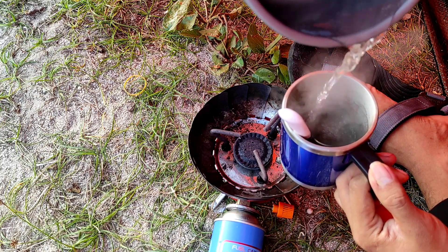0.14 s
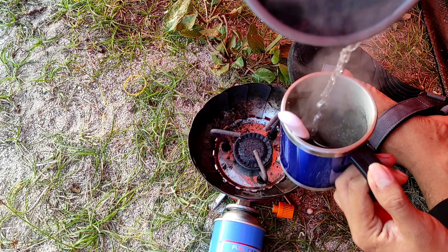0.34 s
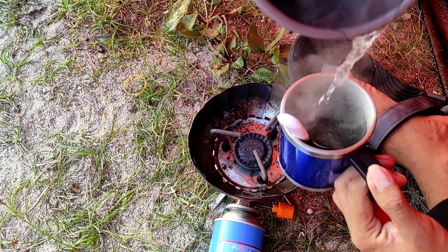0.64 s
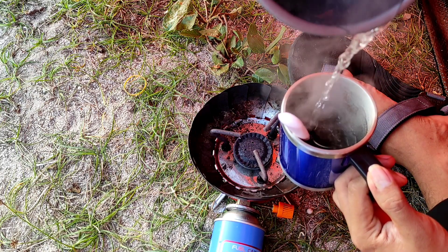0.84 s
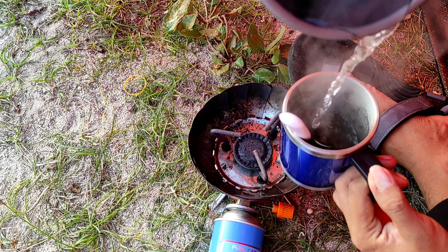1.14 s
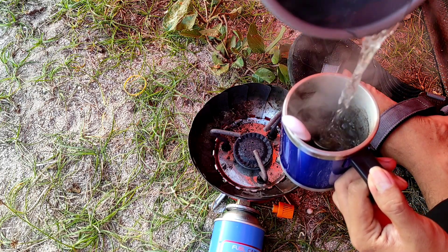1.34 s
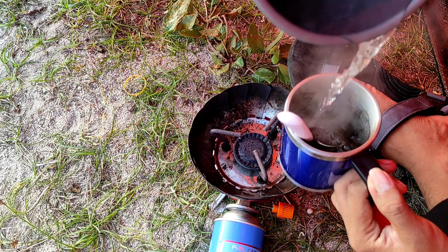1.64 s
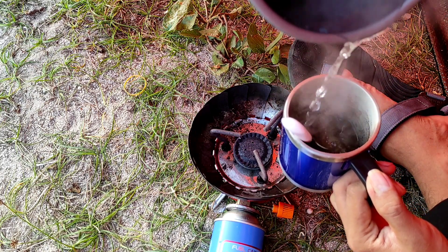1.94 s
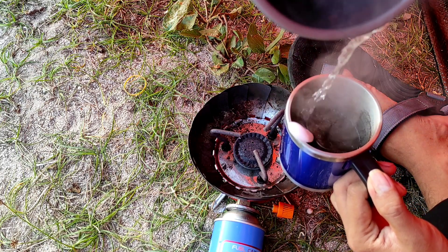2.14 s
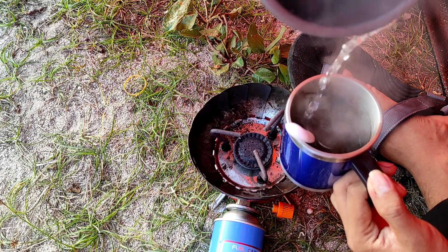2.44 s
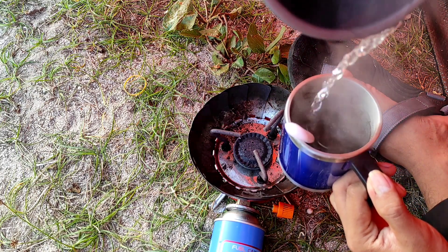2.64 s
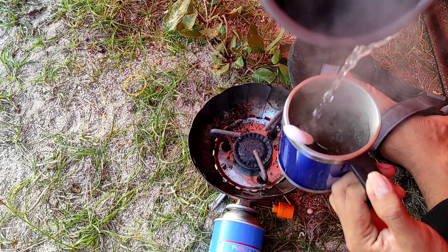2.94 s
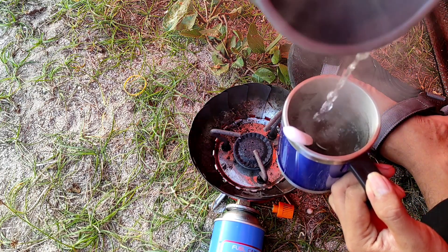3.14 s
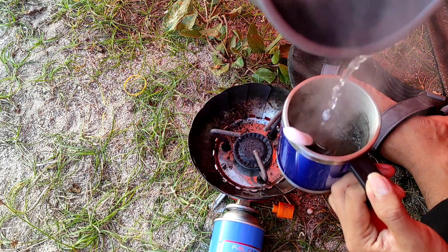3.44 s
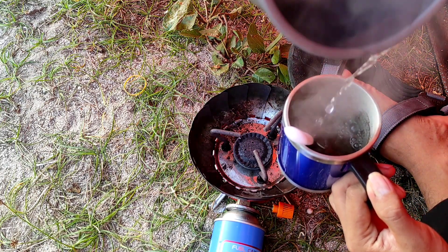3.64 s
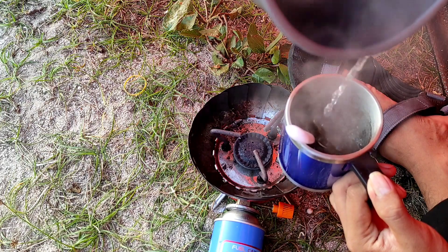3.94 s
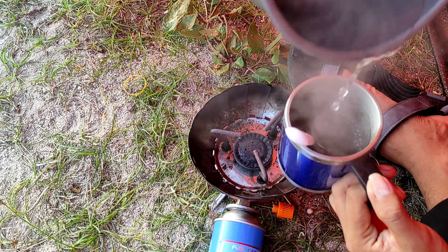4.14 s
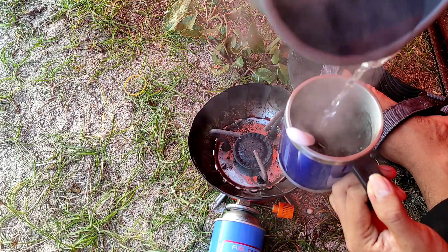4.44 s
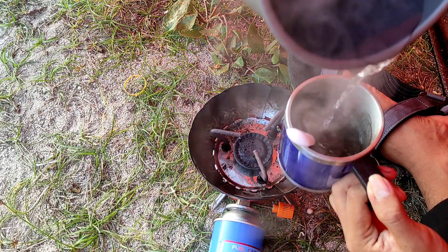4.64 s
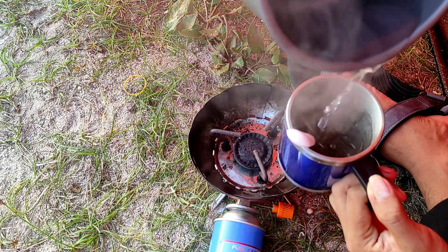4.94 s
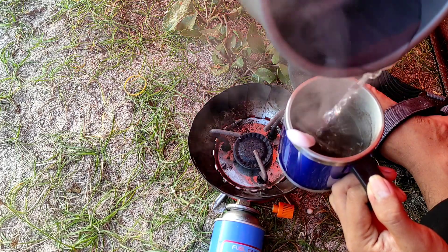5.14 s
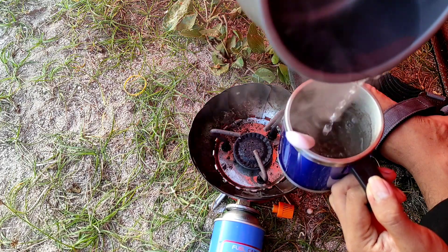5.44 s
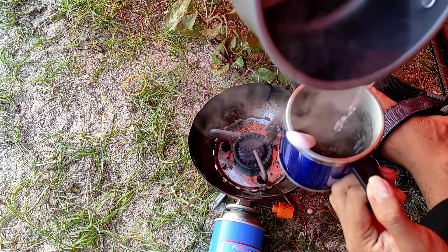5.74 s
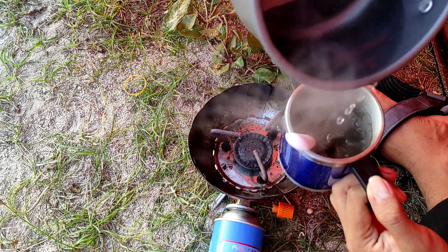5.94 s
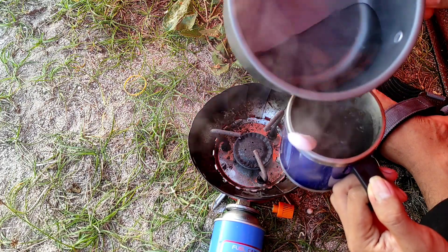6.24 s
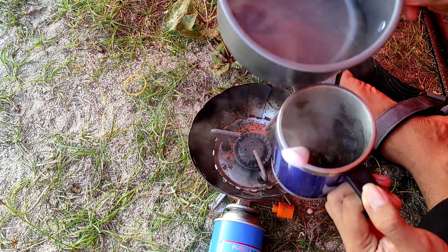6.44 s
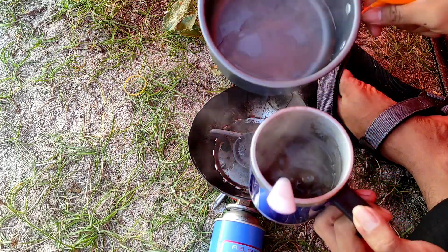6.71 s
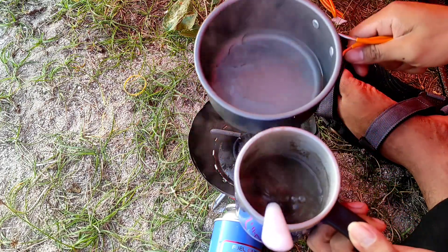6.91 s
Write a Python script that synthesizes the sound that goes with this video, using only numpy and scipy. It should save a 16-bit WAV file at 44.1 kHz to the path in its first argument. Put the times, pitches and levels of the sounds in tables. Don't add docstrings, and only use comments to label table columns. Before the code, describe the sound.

Hot water trickles unevenly into a metal mug with plops and fizzy spatter, then a pot knocks sharply against a stove and the mug scrapes briefly.

```python
import sys
import numpy as np
from scipy import signal
from scipy.fft import rfft, irfft, next_fast_len
from scipy.io import wavfile
from scipy.ndimage import uniform_filter1d

SR = 44100
rng = np.random.default_rng(int(sys.argv[2]) if len(sys.argv) > 2 else 0)


def put_to_file(sound):
    columns = np.atleast_2d(sound).T
    safe = np.clip(columns, -1, 1)
    whole_steps = np.round(safe * 32767)
    wavfile.write(sys.argv[1], SR, whole_steps.astype(np.int16))


def volts_from_db(level):
    exponent = np.asarray(level, float) / 20
    return 10 ** exponent


N = 311787

# (time [s], bubble level [dB], bubble pitch [Hz], gulp level [dB])
PLOPS = [(0.872, -40, 920, -58), (0.922, -42.5, 954, -59), (1.304, -36.5, 990, -46.5),
         (2.113, -38, 1000, -51), (2.206, -36.5, 885, -41), (2.23, -32.5, 1020, -48),
         (2.254, -37, 1000, -47), (2.268, -37, 1040, -49), (2.419, -31.5, 1023, -40), (2.48, -37, 970, -56),
         (2.537, -37.5, 945, -44.5), (2.58, -35, 1060, -44.5), (2.931, -37.5, 960, -46.5),
         (2.943, -36.5, 1050, -44.5), (3.165, -37.5, 1090, -47), (3.229, -36.5, 1130, -44.5),
         (3.249, -36, 1080, -55), (3.276, -30, 1105, -45.5), (3.41, -35, 1104, -50),
         (3.582, -34, 966, -44.5), (3.677, -35, 1070, -39), (4.203, -38.5, 1190, -55),
         (4.461, -38.5, 1050, -49), (4.659, -37.5, 1050, -51.5), (4.7, -39.5, 1110, -50),
         (4.734, -39, 1100, -49), (5.238, -39, 1175, -46.5), (5.39, -33.5, 1140, -39.5),
         (5.558, -38.5, 1090, -47), (5.607, -29, 1197, -54)]
# (time [s], bubble level [dB], bubble pitch [Hz])
PLIPS = [(0.463, -47.5, 1350), (0.609, -48, 1580), (0.776, -45, 1320), (0.813, -43, 960), (1.12, -48, 1570),
         (1.582, -42.5, 950), (2.135, -42.5, 1000), (2.803, -40.5, 1120), (2.821, -41.5, 990),
         (2.962, -41.5, 1050), (3.042, -41, 1010), (3.059, -41, 1030), (3.174, -39.5, 990),
         (3.309, -38.5, 985), (3.372, -40, 1114), (3.484, -39, 1096), (3.744, -38.5, 1060),
         (3.876, -44.5, 1100), (3.92, -46, 1380), (4.118, -41, 1100), (4.606, -43, 1110), (4.78, -43, 1130),
         (4.865, -44.5, 1230), (5.018, -43, 1120), (5.136, -46, 970), (5.183, -44, 1140),
         (5.285, -45.5, 1170), (5.415, -41.5, 1230), (5.703, -45, 1050), (5.969, -50.5, 905)]
BEADS = [(0.014, -49, 920), (0.025, -54, 1030), (0.06, -48.5, 960), (0.36, -48, 1040), (0.508, -47.5, 1340),
         (0.541, -49.5, 990), (0.822, -43.5, 950), (0.885, -46, 970), (1.061, -47, 950), (1.129, -44, 1500),
         (1.241, -52, 940), (1.286, -47, 950), (1.595, -53, 920), (1.846, -48.5, 1060), (2.142, -48, 1070),
         (2.161, -46, 950), (2.466, -55, 950), (2.496, -44, 970), (2.605, -46, 1140), (2.613, -45.5, 970),
         (2.64, -44, 1100), (2.653, -44, 1050), (2.682, -46, 1110), (2.753, -42.5, 1070),
         (2.811, -45.5, 1090), (2.995, -45.5, 960), (3.102, -46, 1050), (3.141, -46, 1060),
         (3.209, -40, 1060), (3.325, -42, 1040), (3.554, -42, 1035), (3.569, -48, 1090), (3.692, -48, 1120),
         (3.715, -41, 1170), (3.77, -45, 1060), (4.083, -49, 1190), (4.108, -44.5, 1110),
         (4.146, -45.5, 950), (4.216, -44, 1040), (4.238, -46, 1110), (4.357, -47, 1010),
         (4.516, -47.5, 990), (4.75, -44, 1660), (4.909, -49, 1130), (4.994, -45.5, 1110),
         (5.089, -46.5, 970), (5.173, -46.5, 1070), (5.322, -45, 1250), (5.335, -42.5, 1200),
         (5.442, -44, 1120), (5.454, -44, 1200), (5.482, -43, 1700), (5.598, -41, 980), (5.626, -48, 1140),
         (5.659, -44, 990), (5.713, -51, 1200), (5.755, -53.5, 1110), (5.78, -47, 1100)]
SPECKS = [(0.244, -53, 935), (0.276, -51, 940), (0.335, -51.5, 945), (0.644, -58, 940), (0.95, -48, 1020),
          (1.035, -50.5, 960), (1.35, -50.5, 1060), (3.191, -50, 1060), (3.269, -45, 1160),
          (3.296, -49, 1090), (3.34, -48, 980), (6.65, -62.5, 1350), (6.651, -62, 2600)]
# (time [s], gulp level [dB])
GULPS = [(4.84, -45.5), (4.867, -48.5), (4.903, -49), (5.09, -45.5), (5.172, -50), (5.518, -49)]
GULP_HZ, GULP_WIDTH_HZ = 525, 157
GULP_BELOW_DB, GULP_SPREAD_DB = -9, -4
TURNS_PER_DB = 0.2648
TORN_DB = -10

# (time [s], wall ring [dB], spray [dB])
SPLASHES = [(0.005, -38.5, -56), (0.764, -27, -46), (0.871, -34.5, -49), (0.918, -39.5, -50),
            (1.104, -42.5, -47), (1.285, -33, -46), (1.758, -37.5, -49), (1.842, -41, -54),
            (2.11, -37, -61), (2.243, -41.5, -42), (2.282, -41, -43), (2.419, -44, -48),
            (2.466, -41.5, -45.5), (2.48, -37, -63), (2.639, -38.5, -52), (2.802, -34.5, -53),
            (2.833, -41, -44.5), (2.887, -33, -64), (2.899, -33.5, -38.5), (3.064, -37, -60),
            (3.104, -39, -48), (3.202, -33, -48), (3.229, -29.5, -59), (3.25, -33, -54), (3.714, -39, -50),
            (3.744, -38, -48), (4.61, -38, -59), (4.751, -36, -37), (5.137, -31.5, -45.5),
            (5.414, -37.5, -44)]
SPRAYS = [(0.06, -44.5, -44.5), (0.506, -47, -46), (0.822, -45.5, -45), (0.899, -46, -43),
          (0.935, -54, -36), (1.033, -44.5, -46.5), (1.087, -47, -46), (1.887, -56, -47),
          (2.503, -38.5, -47), (2.819, -34.5, -44), (2.929, -49, -38), (3.017, -75, -39),
          (3.153, -39.5, -47), (3.325, -46, -43.5), (3.371, -41.5, -38.5), (3.437, -54, -41.5),
          (3.554, -45, -48.5), (3.768, -43.5, -47), (4.004, -67, -37.5), (4.084, -43, -50.5),
          (4.514, -42, -37.5), (4.658, -70, -47.5), (4.731, -62, -38.5), (4.84, -48, -45.5),
          (5.016, -51.5, -42.5), (5.234, -43, -44), (5.283, -37, -31.5), (5.32, -44.5, -44.5),
          (5.556, -51, -46), (5.608, -53, -46.5)]
DABS = [(0.012, -40.5, -38.5), (0.178, -50, -58), (0.215, -45, -53.5), (0.334, -44.5, -48.5),
        (0.361, -42, -49.5), (0.55, -46.5, -50.5), (0.683, -45.5, -47.5), (1.023, -50, -43.5),
        (1.314, -42, -57), (1.351, -42.5, -68), (1.717, -43, -47.5), (2.135, -39.5, -51.5),
        (2.448, -44, -48), (2.605, -38.5, -56), (3.692, -41, -45), (3.22, -29, -61), (3.528, -44.5, -49),
        (3.615, -48, -48), (3.677, -56, -79), (4.051, -44, -50), (4.245, -45, -49.5), (4.478, -52, -52),
        (4.809, -42, -49), (4.91, -41, -60), (4.925, -52, -45.5), (5.089, -46.5, -51.5), (5.266, -70, -46),
        (5.515, -45, -49.5), (5.706, -41, -44), (5.733, -48, -49.5)]
# (time [s], wall ring [dB], spray [dB])
EARLY_SPITS = [(0.025, -46.5, -59), (0.044, -54, -50), (0.081, -52, -56), (0.128, -74, -56),
               (0.46, -53, -64), (0.513, -56, -64), (0.608, -50, -59), (0.63, -47, -74),
               (0.701, -49.5, -66), (0.781, -52, -57), (0.802, -50, -52), (0.811, -48, -55),
               (0.836, -52, -48), (0.885, -49, -45), (0.951, -51.5, -50), (0.969, -56, -56),
               (1.012, -55, -46), (1.06, -50, -51), (1.122, -43, -55), (1.135, -50, -64), (1.185, -53, -53),
               (1.206, -57, -52), (1.221, -54, -58), (1.241, -49, -62), (1.253, -52, -55),
               (1.327, -52, -51), (1.373, -49, -57), (1.384, -54, -58), (1.594, -55, -52),
               (1.648, -58, -49.5), (1.671, -48, -52), (1.696, -52, -53), (1.772, -53, -50),
               (1.812, -58, -52), (1.868, -51, -60), (2.081, -53, -59), (2.089, -43, -61),
               (2.143, -53, -70), (2.193, -50, -65), (2.356, -57, -53), (2.515, -54, -65), (2.63, -42, -53),
               (2.653, -59, -64), (2.683, -52.5, -68), (2.724, -53, -57)]
LATE_SPITS = [(2.742, -53, -63), (2.75, -53, -62), (2.863, -47, -55), (2.956, -64, -41), (2.974, -53, -49),
              (2.992, -49, -48), (3.036, -46, -42.5), (3.141, -50, -43.5), (3.177, -52, -55),
              (3.294, -63, -50), (3.307, -52, -47.5), (3.352, -56, -49), (3.381, -63, -58),
              (3.449, -68, -54), (3.482, -47, -65), (3.568, -55, -56), (3.6, -53, -58), (3.858, -62, -52),
              (3.919, -57, -54.5), (3.988, -50, -58), (4.065, -49, -62), (4.107, -50, -62),
              (4.117, -57, -57), (4.159, -56, -62), (4.174, -50, -49.5), (4.237, -47, -59),
              (4.328, -53, -57), (4.343, -57, -50.5), (4.378, -52, -60), (4.575, -51, -52),
              (4.591, -64, -49.5), (4.641, -64, -54), (4.778, -53, -52), (4.865, -50, -63),
              (4.902, -46, -62), (4.945, -52, -60), (4.992, -58.5, -58), (5.028, -63, -54),
              (5.075, -59, -62), (5.301, -48, -60), (5.334, -66, -54), (5.352, -61, -57), (5.363, -51, -56),
              (5.442, -58, -53), (5.476, -74, -50.5), (5.779, -53, -65), (5.827, -61, -52)]
SPIT_RING_DB = 3
SLAP_DB, SLAP_SPRAY_DB = -2, -18

# (time [s], patter level [dB], fizz level [dB])
FLOW = [(0, -68, -74.5), (1.25, -64, -68), (1.85, -64, -69), (2.03, -69.5, -74), (2.2, -60.5, -71.5),
        (3.2, -65.5, -67), (3.75, -68, -87), (3.85, -73, -80), (4.2, -65, -66.5), (4.29, -71, -81),
        (4.45, -66, -69), (5.6, -66.5, -82), (5.85, -71.5, -82)]
# (time [s], length [s], level [dB], centre [Hz], width [Hz])
SHEETS = [
    (0.0, 0.043, -63.5, 4030, 4880),
    (0.392, 0.12, -57.5, 2050, 2080),
    (1.09, 0.093, -57.5, 1820, 2280),
    (2.713, 0.24, -57.5, 4100, 9000),
]
# (time [s], level [dB], centre [Hz], length [s])
DRIPS = [
    (6.073, -65, 1440, 0.0053),
    (6.117, -60, 2000, 0.0058),
]

# (time [s], column pitch [Hz], main wall tone [Hz])
COLUMN = [(0, 950, 2975), (2, 1020, 2995), (4, 1110, 3040), (6.2, 1190, 3100)]
# (pitch [Hz], width [Hz], level [dB])
WALL = [(1656, 167, -9.5), (3080, 530, -16), (4080, 310, -3.5), (2700, 224, 0), (1760, 69, -19.5),
        (3410, 180, -6)]
MUTE_DB_PER_S = -2.3
# (pitch [Hz], width [Hz], level [dB])
EMPTY_RIM = [(4470, 180, -3), (5370, 230, 3), (7260, 580, -2.5), (8730, 300, 3)]
FULL_RIM = [(4810, 190, -3), (5830, 400, 2.5), (7120, 280, -1), (7080, 150, 4.5), (8790, 630, 0.5)]
# (frequency [Hz], density [dB per Hz])
SPRAY = [(1000, -1), (2000, -8.5), (6000, -9), (9500, -12), (12000, -22), (16000, -38)]
PATTER = [(130, -16), (250, -5), (2000, -18), (3000, -13), (7000, -48)]

# (frequency [Hz], density [dB per Hz])
AIR = [(60, -35), (110, -6), (200, -10.5), (500, -15.5), (5500, -28), (15000, -31.5)]
AIR_DB = -73
# (frequency [Hz], density [dB per Hz])
WIND = [(0, -70), (3.1, -65.5), (3.7, -67), (7.07, -70)]
WIND_SPECTRUM = [(3, 12.5), (12, 11.0), (30, -3.0), (70, 1), (150, -8.0), (300, -27.0), (600, -57.5)]

# (level [dB], pitch [Hz], rise [s], t60 [s])
THUD_TIMES_S = [3.03, 3.03, 7.0285, 7.0275]
THUDS = [
    (-56, 60, 0.018, 0.51),
    (-58, 199, 0.037, 0.23),
    (-41, 61.4, .025, 0.54),
    (-52, 223, 0.0054, 0.077),
]
# (frequency [Hz], density [dB per Hz])
SHUFFLE = [(6.99, -98), (7.03, -57.5), (7.07, -54.5)]
CLOTH = [(100, 12.5), (300, 3), (1800, -14), (5000, -25), (15000, -29)]

# (pitch [Hz], level [dB], t60 [s])
POT = [(1000, 4, 0.022), (454, -3.5, .35), (719, -19, .15), (853, -12, .04), (930, -20, .04),
       (1037, -8, .055), (1185, -13, .12), (1355, -8, .06), (1630, -7, .07), (682, -22, .15),
       (330, -5, .014), (3055, -16, .04), (4540, -16, .035), (1090, -27, .2)]
STAND = [(570, -14, .1), (1310, -16, .05), (1785, -22, .07), (2290, -24, .07), (2815, -24, .07),
         (3400, -24, .06), (3570, -24, .07), (3930, -25, .07), (4250, -24, .07), (5050, -30, .06)]
LONGEST_TURNS = 330
# (time [s], level [dB])
KNOCKS = [
    (6.3152, -23),
    (6.3162, -17),
    (6.3172, -12),
    (6.3183, -13),
    (6.3375, -28),
    (6.355, -37),
    (6.368, -50),
]
# (frequency [Hz], density [dB per Hz])
CRACK = [(700, -29), (1400, -2), (2100, -31), (3100, -13), (5600, -24), (10800, -31.5), (15500, -55)]
GRIP_S, GRIP_DB, LOW_TONES_HZ = 0.08, -43, 800
PUSH_S, PUSH_DB, LOW_CHATTER = 6.3152, -11, 0.04

# (pitch [Hz], level [dB], t60 [s])
RIM = [(754, -12, .06), (1040, -7, .1), (1310, -6, .06), (1930, -17, .04), (3060, -10, .022),
       (3630, -13, .025), (4640, -15, .022), (6470, -11, .008)]
# (time [s], level [dB])
SCRAPE = [(6.39, -59.5), (6.45, -59), (6.466, -54.5), (6.485, -46), (6.502, -43), (6.51, -48), (6.52, -57)]
# (time [s], level [dB])
TICKS = [(6.5018, -24), (6.5029, -22)]


def evened(x):
    return x / np.sqrt(np.mean(x ** 2) + 1e-20)


def read(points, hz):
    f, value = np.transpose(points)
    return np.interp(np.log(hz + 1), np.log(f + 1), value)


def curve(rows, order=1):
    rows = np.array(rows)
    return np.interp(np.arange(N) / SR, rows[:, 0], rows[:, order])


def level(rows, order=1):
    t = np.arange(N) / SR
    return volts_from_db(curve(rows, order)) * (t > rows[0][0]) * (t <= rows[-1][0])


def add(mix, s, sound):
    part = mix[round(s * SR):][:len(sound)]
    part += sound[:len(part)]


def colour(x, points):
    size = next_fast_len(len(x))
    gain = volts_from_db(read(points, np.fft.rfftfreq(size, 1 / SR)))
    return evened(irfft(rfft(x, size) * gain, size)[:len(x)])


def resonate(x, hz, width):
    r = np.exp(-np.pi * width / SR)
    if np.isscalar(hz):
        return signal.lfilter([1], [1, -r * np.exp(2j * np.pi * hz / SR)], x).real
    turn = np.exp(2j * np.pi * np.cumsum(hz) / SR)
    return (turn * signal.lfilter([1], [1, -r], x / turn)).real


def struck(x, modes):
    t = np.arange(SR // 5) / SR
    ring = np.zeros(len(t))
    for hz, db, t60 in modes:
        decay_s = min(t60, LONGEST_TURNS / hz)
        ring += volts_from_db(db - 60 * t / decay_s) * np.sin(2 * np.pi * hz * t)
    return signal.oaconvolve(x, ring)[:len(x)]


def puff(t, rise, fall):
    shape = (1 - np.exp(-t / rise)) * np.exp(-t / fall)
    return shape / shape.max()


def droplets(per_s, spread_db, fall):
    size = volts_from_db(spread_db * np.minimum(rng.exponential(1, N), 4)) * (rng.random(N) < per_s / SR)
    bursts = signal.oaconvolve(size, puff(np.arange(600) / SR, 0.00026, fall))[:N]
    return evened(bursts * rng.standard_normal(N))


def wall(x):
    muted = x * volts_from_db(MUTE_DB_PER_S * np.arange(N) / SR)
    sides = np.zeros(N)
    for k, (hz, width, db) in enumerate(WALL):
        drive = muted if hz > 2 * COLUMN[-1][1] else x
        sides += (-1) ** k * volts_from_db(db) * resonate(drive, hz, width)
    drift = uniform_filter1d(uniform_filter1d(rng.standard_normal(N), 600), 600)
    slosh = 1 + 0.0055 * evened(drift)
    return sides + resonate(x, curve(COLUMN, order=2) * slosh, 100)


def rim(x):
    full = np.clip((np.arange(N) / SR - 1.5) / 1.94, 0, 1)

    def ring(tones):
        return sum((-1) ** k * volts_from_db(db) * width / SR * resonate(x, hz, width)
                   for k, (hz, width, db) in enumerate(tones))

    return 0.426 * x + 6.8 * (np.sqrt(1 - full) * ring(EMPTY_RIM) + np.sqrt(full) * ring(FULL_RIM))


def gurgle():
    t, out = np.arange(500) / SR, np.zeros(N)
    for hz in np.geomspace(420, 2600, num=14):
        size = volts_from_db(2.9 * np.minimum(rng.exponential(1, N), 4)) * (rng.random(N) < 22 / SR)
        bubble = puff(t, 0.0008, 21.0 / hz) * np.sin(2 * np.pi * hz * (t + 18 * t ** 2))
        out += signal.oaconvolve(size, bubble)[:N]
    return evened(out)


def stream():
    drops = droplets(per_s=220, spread_db=5.0, fall=0.0018)
    column_drops = droplets(per_s=400, spread_db=3, fall=0.0011)
    column = evened(resonate(column_drops, curve(COLUMN), 150))
    patter = 1.48 * column + 0.56 * evened(wall(drops)) + 0.82 * colour(drops, PATTER) + 0.68 * gurgle()
    fizz = rim(colour(droplets(per_s=370, spread_db=-2.0, fall=0.0021), SPRAY))
    return volts_from_db(1.0) * level(FLOW) * evened(patter) + volts_from_db(-3.5) * level(FLOW, order=2) * evened(fizz)


def sheets():
    out, spatter = np.zeros(N), droplets(per_s=1100, spread_db=3.5, fall=0.002)
    for s, length, db, hz, width in SHEETS:
        part = spatter[round(s * SR):][:round(length * SR)]
        band = resonate(resonate(part, hz, width), hz, width)
        add(out, s, volts_from_db(db) * evened(band) * signal.windows.tukey(len(part), 0.7))
    for s, db, hz, length in DRIPS:
        hiss = evened(resonate(rng.standard_normal(900), hz, hz))
        add(out, s, volts_from_db(db) * hiss * puff(np.arange(900) / SR, 0.0008, length))
    return out


def splashes(hits):
    t, drive, coarse, fine = np.arange(700) / SR, np.zeros(N), np.zeros(N), np.zeros(N)
    wall_hz = (COLUMN[1][2], WALL[0][0])
    luck, grit = rng.random((len(hits), 3)), rng.standard_normal((len(hits), 700))
    for (s, ring_db, spray_db), (long, tail, mist), noise in zip(hits, luck, grit):
        burst = noise * puff(t, 0.000085, 0.0012 + 0.0064 * long)
        pull = max(abs(burst @ np.exp(2j * np.pi * hz * t)) for hz in wall_hz)
        burst = burst / (0.8 * pull + 0.5 * np.linalg.norm(burst))
        add(drive, max(s - 0.0022, 0), volts_from_db(ring_db - 0.5) * burst)
        tick = puff(t, 0.00015, 0.00061)
        hiss = volts_from_db(spray_db - 6.0) * (tick + 0.5 * puff(t, 0.00088, 0.0048 + 0.0013 * tail))
        add(coarse, max(s - 0.0012, 0), hiss * np.cos(mist * np.pi / 2))
        add(fine, max(s - 0.0012, 0), hiss * np.sin(mist * np.pi / 2))
    noise = colour(rng.standard_normal(N), SPRAY)
    spray = coarse * evened(resonate(noise, 5980, 2900)) + fine * evened(resonate(noise, 12500, 7500))
    return wall(drive) + 0.32 * resonate(drive, curve(COLUMN), 210) + rim(spray)


def plops(blobs):
    t, bubbles, gulps = np.arange(900) / SR, np.zeros(N), np.zeros(N)
    luck = rng.random((len(blobs), 4))
    for (s, db, hz, gulp_db), (turn, size, pitch, glide) in zip(blobs, luck):
        fall = (0.39 + 0.4 * size + TURNS_PER_DB * max(db - gulp_db, 0)) / hz
        turns = hz * (1.01 * t + (6 * glide - 2) * t ** 2) + turn
        swell = puff(t, 0.0011, fall) * np.exp(-(t / (1.94 * fall)) ** 2)
        add(bubbles, s - 0.0022, volts_from_db(db) * swell * np.sin(2 * np.pi * turns))
        blip = puff(t, 0.00043, fall / 2) * np.sin(2 * np.pi * (1.26 + 0.5 * size) * turns)
        add(bubbles, s - 0.002, volts_from_db(db + TORN_DB) * glide * blip)
        gulp_turns = GULP_HZ * (0.806 + 0.42 * pitch) * t + size
        gulp = puff(t, 0.012, 0.33 / GULP_WIDTH_HZ) * np.sin(2 * np.pi * gulp_turns)
        add(gulps, s - 0.0025, volts_from_db(gulp_db - 1.5) * gulp)
    return 1.03 * bubbles + gulps + 0.0022 * resonate(bubbles, curve(COLUMN), 280)


def outdoors():
    lumps = volts_from_db(1.5 * evened(uniform_filter1d(rng.standard_normal(N), 3000)))
    wind = evened(colour(rng.standard_normal(N), WIND_SPECTRUM) * lumps)
    hiss = colour(rng.standard_normal(N), AIR)
    return volts_from_db(AIR_DB) * hiss + volts_from_db(curve(WIND) + 5.0) * wind


def thuds():
    t, out = np.arange(9000) / SR, np.zeros(N)
    for s, (db, hz, rise, t60) in zip(THUD_TIMES_S, THUDS):
        add(out, s, volts_from_db(db) * puff(t, rise, t60 / np.log(1000)) * np.sin(2 * np.pi * hz * t))
    return out + level(SHUFFLE) * colour(rng.standard_normal(N), CLOTH)


def knock():
    push, crack, t = np.zeros(N), np.zeros(N), np.arange(4000) / SR
    grit = rng.standard_normal((len(KNOCKS), len(t)))
    crack_shape = puff(t, 0.0002, 0.0018) + 0.27 * puff(t, 0.0015, 0.006) + 0.01 * puff(t, 0.002, 0.02)
    for (s, db), noise in zip(KNOCKS, grit):
        add(push, s, volts_from_db(db) * ((t == 0) + 0.02 * noise * puff(t, 0.0018, 0.011)))
        add(crack, s - 0.0006, volts_from_db(db - 11) * crack_shape)
    since = np.clip(np.arange(N) / SR - KNOCKS[0][0], 0, 0.1)
    soft = LOW_CHATTER * push
    add(soft, PUSH_S, volts_from_db([PUSH_DB]))
    low_modes = [m for m in POT + STAND if m[0] < LOW_TONES_HZ]
    high_modes = [m for m in POT + STAND if m[0] >= LOW_TONES_HZ]
    low = struck(soft, low_modes) * volts_from_db(GRIP_DB * (since / GRIP_S) ** 3)
    high = struck(push, high_modes) * volts_from_db(-5 * (since / 0.13) ** 3)
    rings = signal.sosfilt(signal.butter(3, 250, "high", fs=SR, output="sos"), low + high)
    return rings + crack * colour(rng.standard_normal(N), CRACK)


def scrape():
    slide = level(SCRAPE) * droplets(per_s=6900, spread_db=-1.0, fall=0.00023)
    for s, db in TICKS:
        add(slide, s, volts_from_db([db]))
    return 0.038 * struck(slide, RIM) + 0.094 * resonate(resonate(slide, 3700, 5500), 3700, 5500)


def ground(x):
    t = np.arange(2500) / SR
    tail = rng.standard_normal(len(t)) * volts_from_db(-60 * t / 0.0052) * (t > 0.002)
    return x + volts_from_db(-19) * signal.oaconvolve(x, tail / np.linalg.norm(tail))[:N]


def all_blobs():
    light = PLIPS + BEADS + SPECKS
    blobs = list(PLOPS)
    for (s, db, hz), shallow in zip(light, rng.random(len(light))):
        blobs.append((s, db, hz, db + GULP_BELOW_DB + GULP_SPREAD_DB * shallow))
    return blobs + [(s, db + GULP_SPREAD_DB, 2 * GULP_HZ, db) for s, db in GULPS]


def all_hits():
    slaps = []
    for s, db, _, gulp_db in PLOPS:
        mean_db = (db + gulp_db) / 2
        slaps.append((s, mean_db + SLAP_DB, mean_db + SLAP_SPRAY_DB))
    spits = [(s, ring + SPIT_RING_DB, spray) for s, ring, spray in EARLY_SPITS + LATE_SPITS]
    return SPLASHES + SPRAYS + DABS + slaps + spits


def scene():
    water = stream() + sheets() + splashes(all_hits()) + plops(all_blobs())
    return (ground(water + scrape()) + outdoors() + thuds() + knock())[None]


def roll_off(x):
    return signal.sosfilt(signal.butter(12, 16390, fs=SR, output="sos"), x)


def record(dry):
    limited = np.clip(dry, -0.97, 0.97)
    band = signal.oaconvolve(limited, signal.firwin(255, 15650, fs=SR)[None], "same")
    return roll_off(band)


dry = scene()
out = record(dry)
put_to_file(out)
```